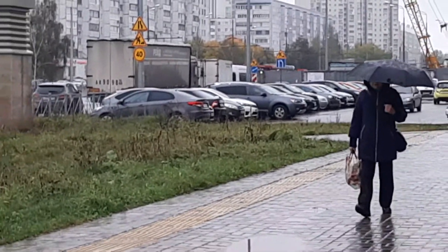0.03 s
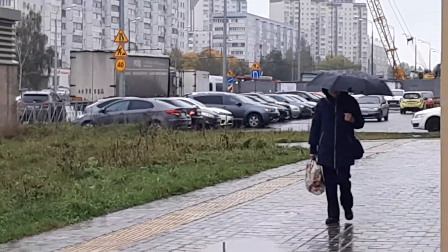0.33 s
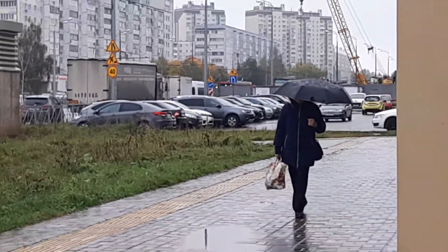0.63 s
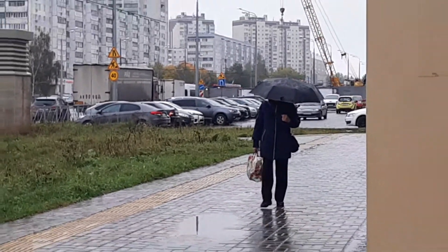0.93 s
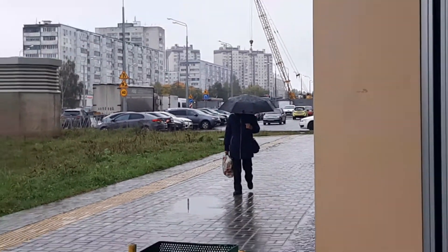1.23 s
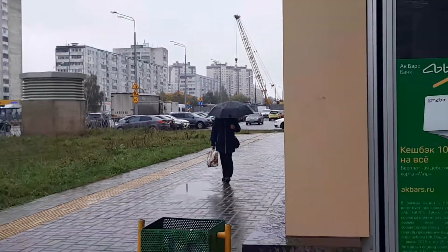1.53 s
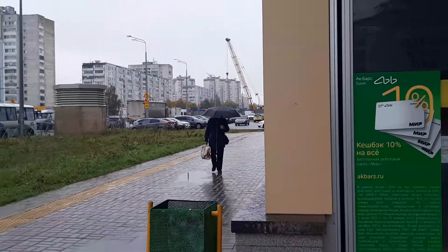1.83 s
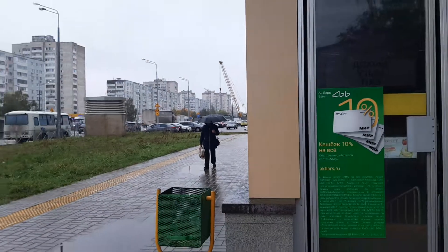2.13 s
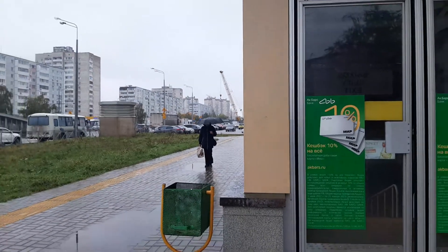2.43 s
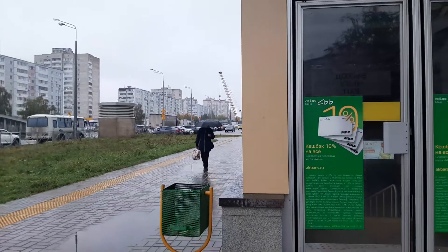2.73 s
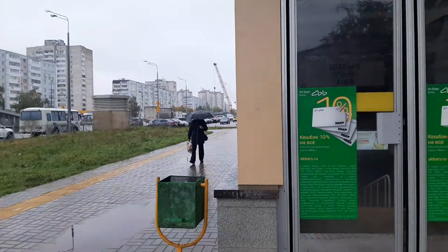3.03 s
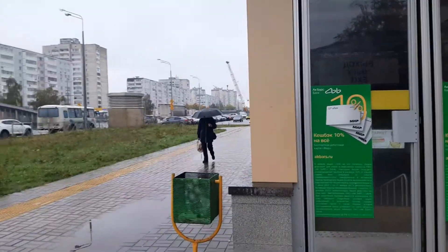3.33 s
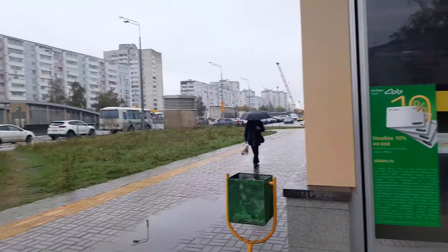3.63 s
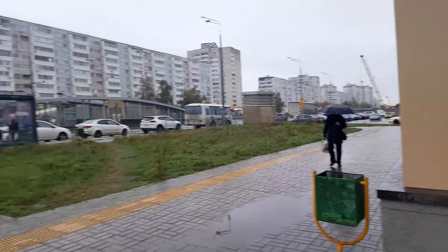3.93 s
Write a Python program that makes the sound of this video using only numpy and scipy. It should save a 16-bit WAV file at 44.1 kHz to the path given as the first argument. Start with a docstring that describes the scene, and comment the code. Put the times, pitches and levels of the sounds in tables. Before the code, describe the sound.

Traffic hisses on a wet road in the distance, with low droning engines.

```python
"""Traffic on a wet road, heard across a lawn from two microphones beside a building.
A heavy engine drones at its firing rate, another pulls away and rises in pitch, and a third murmurs
below them over the rumble of far vehicles. Wet tyres hiss from the open left side, where a wall adds
one short reflection; the right side is sheltered from the hiss. There is one soft thump, and a few
faint drips tick on the paving close by."""
import sys
import numpy as np
from scipy import signal
from scipy.fft import rfft, irfft
from scipy.io import wavfile
from scipy.ndimage import uniform_filter1d

SR = 44100
rng = np.random.default_rng(int(sys.argv[2]) if len(sys.argv) > 2 else 0)


def put_to_file(sound):
    """Save the sound as 16-bit audio at rate SR, in the file named by the first command-line argument."""
    columns = np.atleast_2d(sound).T  # one column per channel
    safe = np.clip(columns, -1, 1)
    whole_steps = np.round(safe * 32767)
    wavfile.write(sys.argv[1], SR, whole_steps.astype(np.int16))


N = 176400
T = np.arange(N) / SR


def undb(db):
    """Decibels to gain."""
    return 10 ** (np.asarray(db) / 20)


def curve(rows, column=1):
    """One column of a table, joined by straight lines in time."""
    rows = np.array(rows, float)
    return np.interp(T, rows[:, 0], rows[:, column])


def noise(spectrum):
    """Noise of rms 1; the spectrum sets only its colour."""
    hz, db = np.array(spectrum, float).T
    freq_hz = np.maximum(np.fft.rfftfreq(N, 1 / SR), 1)
    colour = undb(np.interp(np.log(freq_hz), np.log(hz), db))
    low_cut = np.minimum(freq_hz / hz[0], 1) ** 2
    coloured = irfft(rfft(rng.standard_normal(N)) * colour * low_cut, N)
    return coloured / coloured.std()


def walk(rate_hz):
    """Slow random motion with a spread of 1."""
    hold = int(SR / rate_hz)
    steps = np.repeat(rng.standard_normal(N // hold + 1), hold)
    smooth = uniform_filter1d(uniform_filter1d(steps, hold), hold)[:N]
    return smooth / smooth.std()


# Bass off the house fronts: freq_hz, density_db
SCATTER_SPECTRUM = [(20, -21), (45, 0), (70, -0.5), (110, -3.5), (300, -5.5), (420, -11.5), (800, -40),
                    (3000, -120)]
def scattered_bass(level_db=-42.5):
    """Bass scattered by house fronts, unrelated at the two microphones."""
    return np.array([noise(SCATTER_SPECTRUM), noise(SCATTER_SPECTRUM)]) * undb(level_db)


# Rumble and mid roar in the distance: freq_hz, density_db
RUMBLE_SPECTRUM = [(20, -24), (34, -20.5), (48, -8.5), (62, -1), (85, 1), (110, -3), (150, -3), (200, -14),
                   (300, -22.5), (800, -57), (3000, -120)]
ROAR_SPECTRUM = [(100, -19.5), (170, -4.5), (210, -0.5), (260, 2), (310, 0), (370, -2.5), (430, -10),
                 (540, -11.5), (800, -28), (1500, -44.5), (5000, -110)]
# Their levels within the bass mix: time_s, rumble_db, roar_db
FAR_LEVELS = [(0, -28.5, -39), (.5, -30, -38), (.75, -33, -36), (1.5, -30, -35), (2.15, -35, -36),
              (2.7, -31, -38), (3.45, -30, -37), (4, -31.5, -38)]
def far_traffic(flicker_db=0.37):
    """Many far vehicles blur into a deep rumble and a roar above it."""
    rumble = noise(RUMBLE_SPECTRUM) * undb(curve(FAR_LEVELS) + flicker_db * walk(8.1))
    roar = noise(ROAR_SPECTRUM) * undb(curve(FAR_LEVELS, column=2) + flicker_db * walk(14))
    return rumble + roar


# Drips close to the left microphone: start_s, level_db
DRIP_HITS = [(.555, -49.5), (1.132, -58), (1.688, -60), (2.712, -62), (3.435, -60)]
# Their splat: freq_hz, density_db
DRIP_SPECTRUM = [(2000, -10), (5000, -4), (12000, 5), (16000, -4)]
def drips(decay_s=0.0034, right_db=-11):
    """Drops hit the paving in tiny bright splats."""
    envelope = sum(undb(level_db) * (T >= start_s) * np.exp(-np.abs(T - start_s) / decay_s)
                   for start_s, level_db in DRIP_HITS)
    return envelope * np.array([noise(DRIP_SPECTRUM), noise(DRIP_SPECTRUM) * undb(right_db)])


def thump(peak_s=1.547, pitch_hz=115, width_s=0.009, mix_db=-18):
    """One soft, low knock: a few cycles under a bell-shaped envelope."""
    offset_s = T - peak_s
    envelope = undb(mix_db) * np.exp(-(offset_s / width_s) ** 2)
    return -envelope * np.cos(2 * np.pi * pitch_hz * offset_s)


def hiss(left_spectrum, right_spectrum, levels, right_db, flicker_db=0.36):
    """Diffuse hiss, unrelated at the two microphones and weaker on the right."""
    pair = np.array([noise(left_spectrum), noise(right_spectrum) * undb(right_db)])
    return pair * undb(curve(levels) + flicker_db * walk(9.13))


# Tread roar on the open left, on the sheltered right and common to both: freq_hz, density_db
TREAD_LEFT = [(200, -28), (400, 2.5), (550, -0.5), (700, -1), (950, -1), (1300, -1), (1650, -3.5),
              (2100, -3), (2600, -6.5), (3100, -6.5), (3600, -10.5), (4500, -23), (6500, -34), (9000, -65)]
TREAD_RIGHT = [(200, -15), (400, -10), (600, -7), (850, -4), (1200, -0.5), (1600, 0.5), (1850, -3.5),
               (2100, -1), (2600, -7.5), (3100, -5.5), (3600, -17), (5000, -19), (8000, -65)]
TREAD_COMMON = [(500, -59), (1250, -15.5), (1550, -1.5), (1750, -2.5), (2000, -18), (5000, -75.5)]
# Shelter from that roar: time_s, right_minus_left_db
TREAD_SHELTER = [(0, -11), (1, -11), (2.4, -13.5), (3.1, -13.5), (4, -12.5)]
# Spray, and the thin fizz above it, at each microphone: freq_hz, density_db
SPRAY_LEFT = [(1000, -16), (2500, -7), (3500, -3), (4150, 0.5), (4700, -2), (5200, -3), (5650, -6),
              (6100, -7), (6600, -12.5), (7200, -18), (7800, -27), (8500, -42), (12000, -60)]
SPRAY_RIGHT = [(1000, -22), (2800, -5.5), (3600, -9), (4000, 4), (4400, -0.5), (5000, -2.5), (5700, -9),
               (6300, -22), (6900, -39), (7400, -48), (12000, -65)]
FIZZ_LEFT = [(5000, -23), (8000, -7), (8600, -5.5), (9300, -1), (11200, 3.5), (13000, 1.5), (15500, -4)]
FIZZ_RIGHT = [(7500, -34.5), (8500, -14.5), (10000, -0.5), (12000, 3), (15500, -3)]
# Each layer at the left microphone: time_s, level_db
TREAD_LEVEL = [(0, -34), (.8, -35), (1.5, -35), (2.6, -35.5), (3.3, -36), (4, -34.5)]
SPRAY_LEVEL = [(0, -40.5), (.22, -42), (.83, -38.5), (1.15, -41), (1.4, -44), (2, -42.5), (2.3, -44),
               (3, -43), (3.2, -43), (4, -43.5)]
FIZZ_LEVEL = [(0, -60), (.22, -65), (.55, -61.5), (.85, -59.5), (1.1, -65.5), (1.45, -67.5), (2, -65.5),
              (2.3, -69), (2.6, -69), (2.75, -66), (2.95, -68.5), (3.2, -63), (3.35, -65), (3.52, -64.5),
              (3.75, -65), (4, -61)]
def wet_tyres(common_db=-51, right_lag_s=0.00036):
    """Across the lawn, treads roar on wet asphalt and throw up water as spray and fine fizz."""
    common = noise(TREAD_COMMON) * undb(common_db)
    common_pair = np.array([common, np.interp(T - right_lag_s, T, common)])
    tread = hiss(TREAD_LEFT, TREAD_RIGHT, TREAD_LEVEL, right_db=curve(TREAD_SHELTER))
    spray = hiss(SPRAY_LEFT, SPRAY_RIGHT, SPRAY_LEVEL, right_db=-12)
    fizz = hiss(FIZZ_LEFT, FIZZ_RIGHT, FIZZ_LEVEL, right_db=-13)
    return tread + common_pair + spray + fizz


# The nearby wall's reflection against the direct hiss: time_s, reflection_db
WALL_REFLECTION = [(0, -19), (1, -15.5), (1.6, -28.5), (4, -35)]
def wall(pair, lag_s=0.000985):
    """The wall mirrors the hiss and combs it on the left, less as the microphone backs away."""
    left, right = pair
    gain = undb(curve(WALL_REFLECTION))
    reflection = gain * np.interp(T - lag_s, T, left)
    return np.array([(left + reflection) / np.sqrt(1 + gain ** 2), right])


def engine(firing_hz, harmonics, wander=0.00503, flutter_db=1.2):
    """Multiples of a slightly unsteady firing rate, each fluttering on its way across the lawn."""
    unsteady_hz = firing_hz * (1 + wander * walk(12))
    phase = 2 * np.pi * (np.cumsum(unsteady_hz) / SR + rng.random())
    return np.sqrt(2) * sum(undb(db + flutter_db * walk(18)) * np.sin(multiple * phase)
                            for multiple, db in harmonics)


# The lowest engine within the bass mix: time_s, firing_hz, level_db
DEEP_ENGINE = [(0, 46, -55), (2.2, 47, -50), (2.7, 48.92, -37), (3.0, 50.1, -35), (3.3, 52, -44),
               (3.5, 53, -48), (4, 53.8, -48)]
def deep_engine():
    """A slow-firing engine murmurs on a single low tone."""
    return engine(curve(DEEP_ENGINE), [(1, curve(DEEP_ENGINE, column=2))])


# The engine pulling away, within the bass mix: time_s, firing_hz, level_db
PULL_AWAY = [(0, 109.4, -55), (1.4, 121.1, -50), (1.8, 131.8, -34), (1.95, 138.3, -30.5),
             (2.06, 142.9, -33.5), (2.25, 149.6, -27.5), (2.72, 163.9, -27.5), (2.82, 167.1, -41.5),
             (3.02, 173.2, -39), (3.24, 180.8, -30.5), (3.47, 187, -38), (3.7, 185, -37.5), (4, 182, -43.5)]
# Its octave: time_s, level_db
PULL_OCTAVE = [(0, -67), (1.3, -41), (2.3, -50), (2.95, -49.5), (3.22, -37), (3.5, -47.5), (4, -63.5)]
def accelerating_engine():
    """An engine fires faster as it pulls away, so its tone and octave rise."""
    return engine(curve(PULL_AWAY), [(1, curve(PULL_AWAY, column=2)), (2, curve(PULL_OCTAVE))])


# The heavy engine's pitch: time_s, firing_hz
DRONE_PITCH = [(0, 74.8), (.14, 72.1), (.33, 64.4), (.6, 62.92), (1.15, 62.24), (1.6, 62.88), (2.2, 66),
               (2.75, 66.5), (3.3, 67.44), (3.7, 68.3), (4, 71.47)]
# Its harmonics: multiple, relative_db
DRONE_HARMONICS = [(1, 0), (2, -17.5), (3, -22.5)]
# Its swells within the bass mix: time_s, level_db
DRONE_LEVEL = [(0, -35.5), (.06, -22.5), (.17, -27), (.32, -32.5), (.41, -24), (.56, -29), (.7, -39),
               (.88, -28), (1.02, -31), (1.18, -24.5), (1.4, -32), (1.57, -28), (2.05, -41), (2.44, -28.5),
               (2.85, -35), (3.25, -27), (3.38, -42), (3.52, -38), (3.68, -26), (3.85, -35.5), (4, -35.5)]
def heavy_engine():
    """A heavy engine out on the road drones on three harmonics, swelling and fading."""
    return engine(curve(DRONE_PITCH), DRONE_HARMONICS) * undb(curve(DRONE_LEVEL))


# The right microphone against the left: freq_hz, gain_db, phase_lead_rad
RIGHT_RESPONSE = [(40, -7.5, .6), (65, -4.5, .5), (110, -7, 0.15), (189, -4.5, -0.047), (235, -6.5, 0.077),
                  (300, -1.6, -0.54), (356, -4.5, -0.82), (550, -6.5, -0.55), (800, -4, 0.25),
                  (4000, -60, 0)]
def right_microphone_response(bass):
    """The right microphone's port thins the bass, resonates near 300 Hz and shifts its phase."""
    hz, db, lead_rad = np.array(RIGHT_RESPONSE, float).T
    log_freq = np.log(np.maximum(np.fft.rfftfreq(2 * N, 1 / SR), 1))
    gain = undb(np.interp(log_freq, np.log(hz), db))
    phase = np.interp(log_freq, np.log(hz), lead_rad)
    return irfft(rfft(bass, 2 * N) * gain * np.exp(1j * phase))[:N]


def scene(bass_gain_db=2.5):
    """The bass reaches both microphones mostly as one wave; hiss and drips lie over it."""
    engines = heavy_engine() + accelerating_engine() + deep_engine()
    bass = (engines + far_traffic() + thump()) * undb(bass_gain_db)
    bass_pair = np.array([bass, right_microphone_response(bass)])
    return bass_pair + scattered_bass() + wall(wet_tyres()) + drips()


def record(dry):
    """The phone cuts off the top treble steeply."""
    cutoff_hz = 15750
    return signal.sosfilt(signal.ellip(10, .2, 80, cutoff_hz, fs=SR, output="sos"), dry)


dry = scene()
out = record(dry)
put_to_file(out)
```